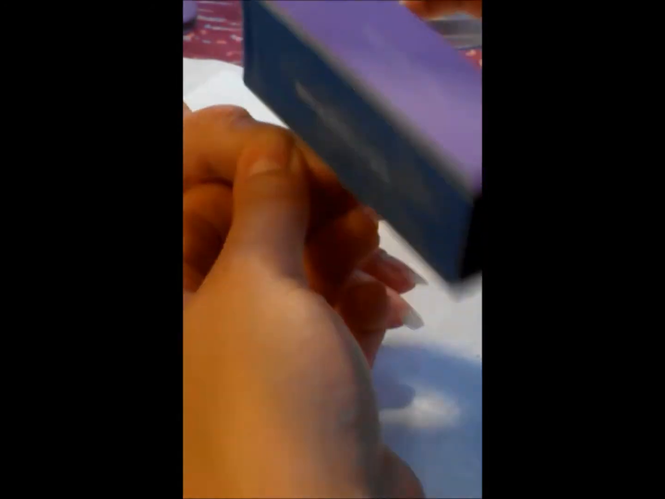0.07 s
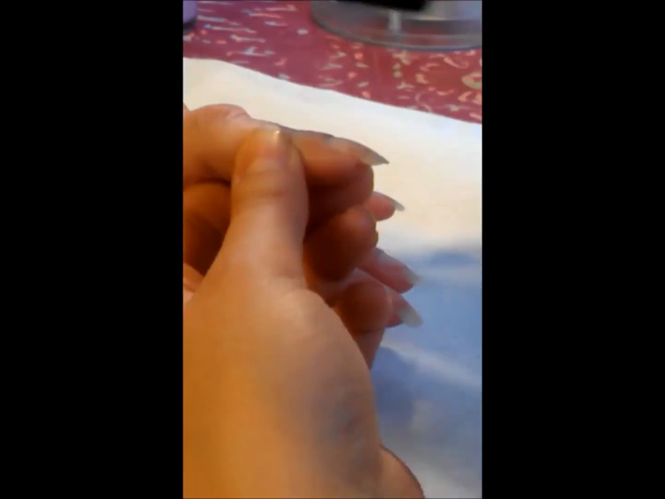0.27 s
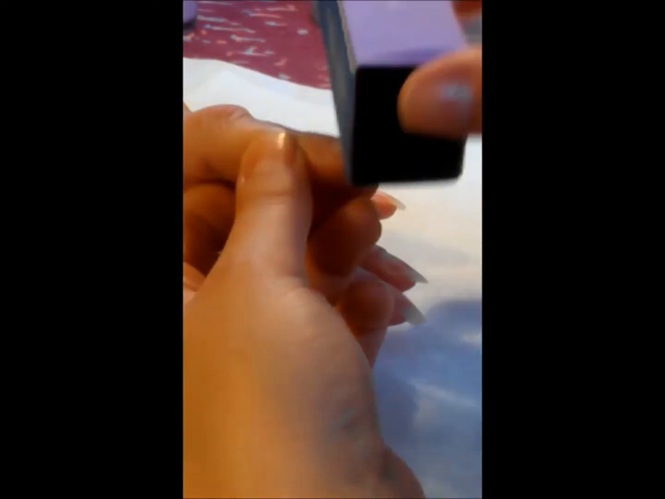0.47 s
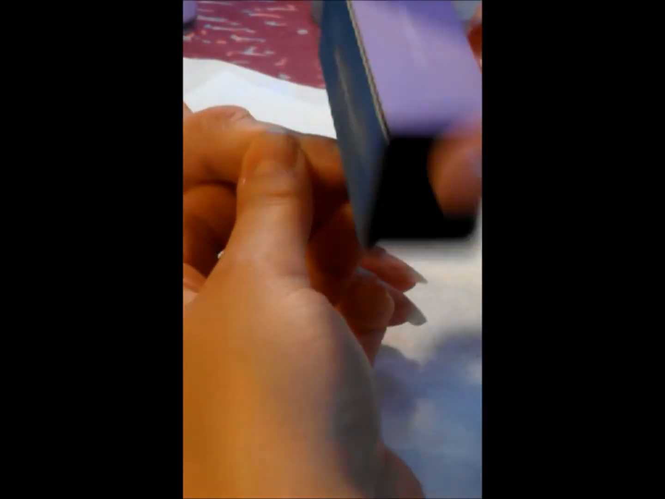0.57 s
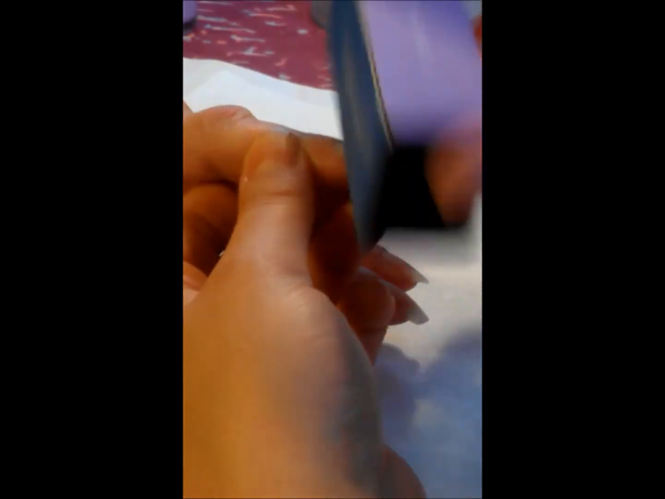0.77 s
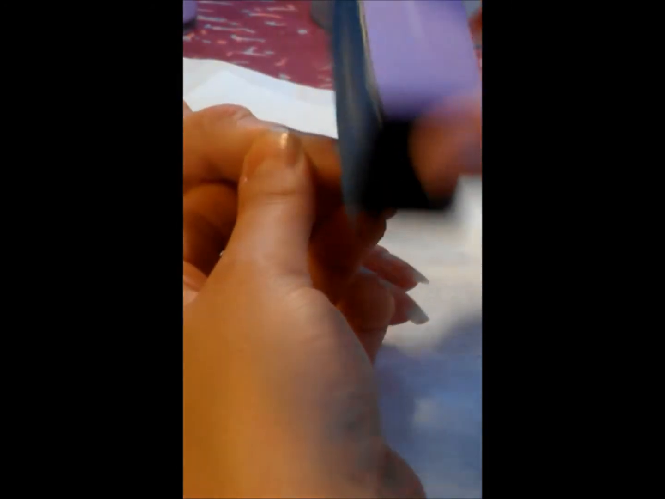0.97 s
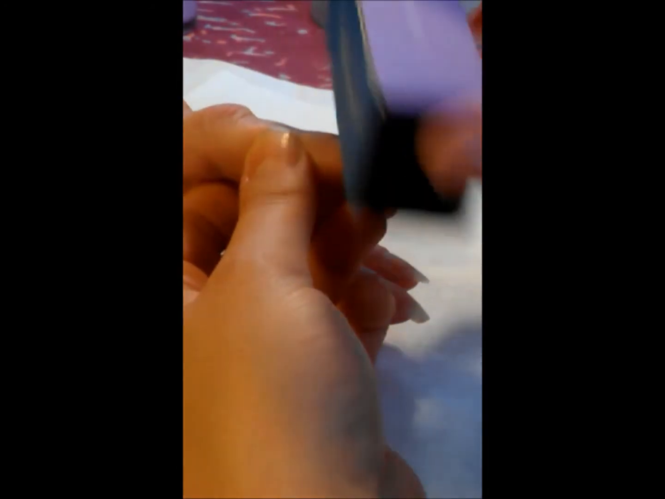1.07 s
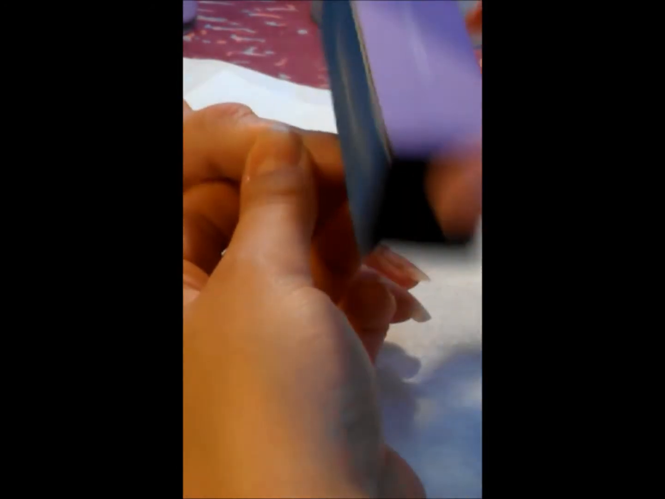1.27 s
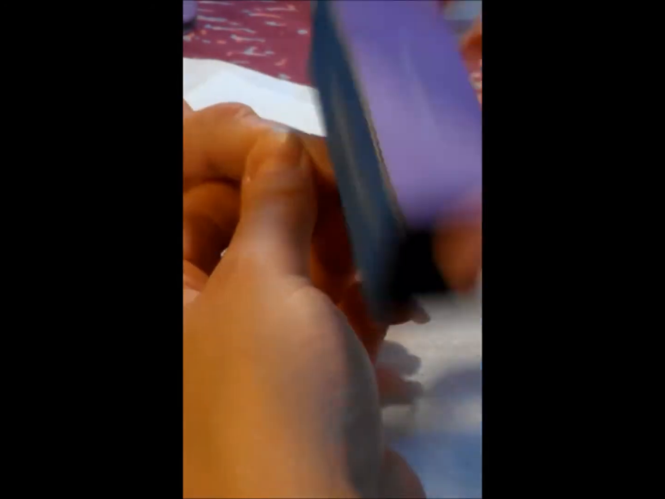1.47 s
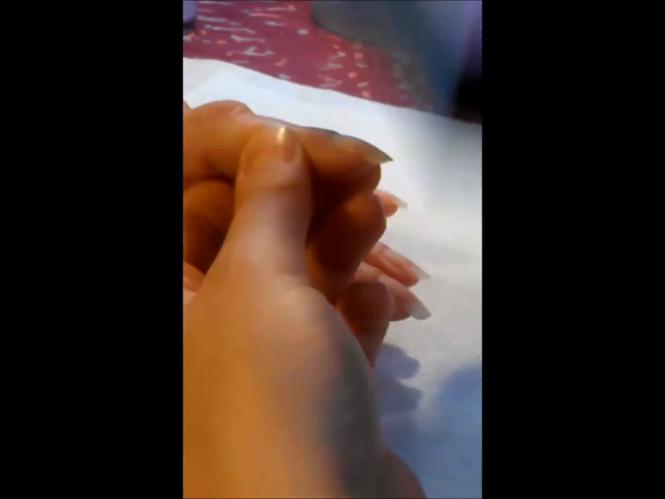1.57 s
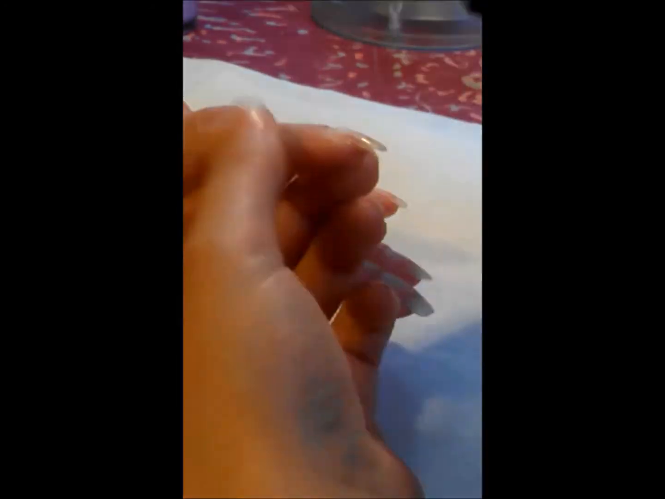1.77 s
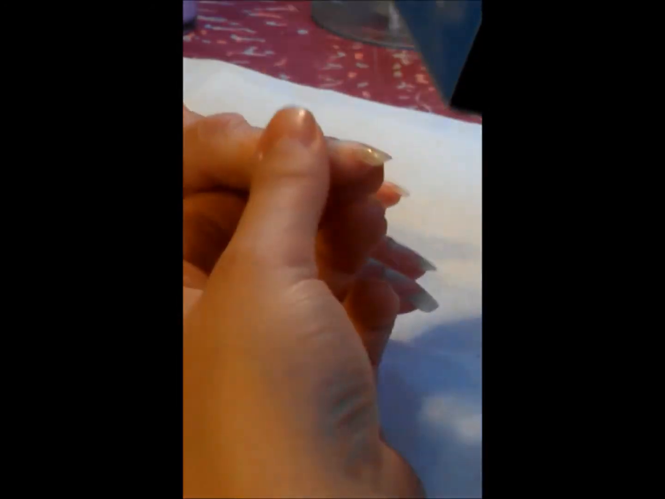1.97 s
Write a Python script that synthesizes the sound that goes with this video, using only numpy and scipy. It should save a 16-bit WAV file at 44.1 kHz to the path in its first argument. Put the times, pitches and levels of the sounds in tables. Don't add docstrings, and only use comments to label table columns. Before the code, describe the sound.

Dry, gritty nail filing heard close up in a small quiet room: a short burst of strokes, a brief gap, a soft click, faster alternating darker and brighter scrapes, then only low room noise and microphone hiss.

```python
import sys
import numpy as np
from scipy import signal
from scipy.fft import rfft, irfft, next_fast_len
from scipy.io import wavfile
from scipy.ndimage import uniform_filter1d, map_coordinates

SR = 44100
rng = np.random.default_rng(int(sys.argv[2]) if len(sys.argv) > 2 else 0)


def gain_from_decibels(decibels):
    exponent = np.asarray(decibels, float) / 20
    return 10 ** exponent


def dump_mix(stems):
    frames = np.atleast_2d(stems).T
    limited = np.clip(frames, -1, 1)
    pcm = np.round(limited * 32767).astype(np.int16)
    wavfile.write(sys.argv[1], SR, pcm)


N = 89126


def unit(x):
    return x / np.sqrt(np.mean(x ** 2) + 1e-20)


def filtered(x, response):
    m = next_fast_len(N + 8192)
    spectrum = rfft(x, m) * response(np.fft.rfftfreq(m, 1 / SR))
    return irfft(spectrum, m)[:N]


def rings(peaks):
    def response(f):
        total = 0
        for k, (hz, width_hz, db) in enumerate(peaks):
            damping = 1j * f * width_hz
            total = total + (-1) ** k * gain_from_decibels(db) * damping / (hz * hz - f * f + damping)
        return total
    return response


def band(lo_hz, hi_hz):
    return lambda f: 1 / (1 + (lo_hz / (f + 1)) ** 4) / (1 + (f / hi_hz) ** 4)


def colour(points):
    hz, db = np.transpose(points)
    return lambda f: gain_from_decibels(np.interp(np.log(f + 1), np.log(hz + 1), db, -120, -120))


def wobble(rate):
    knots = rng.standard_normal(int(N * rate / SR) + 4)
    return map_coordinates(knots, [np.arange(N) * rate / SR])


def controls():
    # (time [s], rubbing level [dB])
    strokes = [
        [(0.0, -34.5), (0.032, -33), (0.044, -45), (0.066, -52)],
        [(0.066, -56), (0.076, -42), (0.132, -33.5), (0.152, -37.5), (0.186, -62)],
        [(0.186, -59), (0.214, -41), (0.248, -36.5), (0.282, -38), (0.345, -63)],
        [(0.596, -65), (0.606, -44), (0.632, -38), (0.688, -33.5), (0.738, -53)],
        [(0.738, -86), (0.744, -42.5), (0.766, -34.5), (0.792, -34.5), (0.806, -29), (0.836, -57)],
        [(0.836, -71), (0.846, -38), (0.908, -29), (0.94, -45.5), (0.948, -68)],
        [(0.948, -45.5), (1.014, -30), (1.04, -41), (1.054, -72)],
        [(1.054, -65), (1.072, -40.5), (1.092, -34.5), (1.134, -35), (1.168, -58)],
        [(1.168, -48), (1.174, -44.5), (1.226, -36), (1.252, -43.5), (1.262, -53)],
        [(1.262, -56), (1.294, -34.5), (1.35, -41.5), (1.356, -34.5), (1.376, -61)],
        [(1.376, -51), (1.39, -41.5), (1.416, -42.5), (1.43, -35.5), (1.48, -32.5), (1.502, -59)],
        [(1.502, -53), (1.526, -33), (1.534, -37), (1.61, -30), (1.632, -35.5), (1.658, -55), (1.675, -69)],
    ]
    # (deep ring at start [dB], deep ring at end [dB], bright ring [dB], sheen [dB], drag [dB])
    stroke_colours = [(4.5, -2.5, 3, -0.5, 1), (7, -0.5, 3, 1, 1.5), (5, -2.5, 3, 3.5, 8.5),
                      (-2.5, 4.5, 1.5, 0.5, 10), (3.5, -11, 0, -1, -7), (-10, 14, 0.5, 1, 0),
                      (6, -12.5, 0, 0.5, -5), (-1.5, 3.5, 2, 1.5, 0), (6.5, -5, 1.5, 1, 0),
                      (-6.5, 11.5, 2, 1, -8), (7, -15, -0.5, 0.5, 0), (-2.5, 2, 2, 1, 1.5)]
    t, out = np.arange(N) / SR, np.zeros((5, N))
    out[0] = -90
    for rows, (first_db, last_db, *rest_db) in zip(strokes, stroke_colours):
        s, db = np.transpose(rows)
        on = t >= s[0]
        fade_db = np.maximum(t[on] - s[-1], 0) * 1500
        out[0, on] = np.interp(t[on], s, db) - fade_db
        out[1, on] = np.interp(t[on], s[[0, -1]], [first_db, last_db])
        out[2:, on] = np.array(rest_db)[:, None]
    return out


def grit():
    grains_per_s, grain_spread_db = 9000, 2.5
    chatter_db, chatter_per_s = 0.5, 280
    chance, luck, side = rng.random((3, N))
    caught = chance < grains_per_s / SR
    size = gain_from_decibels(-grain_spread_db * np.log(luck + 1e-4)) * np.sign(side - .5)
    return unit(caught * size * gain_from_decibels(chatter_db * wobble(chatter_per_s)))


def patchy(x):
    patchy_db = 2
    z = signal.stft(x, nperseg=512)[2]
    field = uniform_filter1d(rng.standard_normal(z.shape), size=3, axis=0)
    field = uniform_filter1d(field, size=6, axis=1)
    return unit(signal.istft(z * gain_from_decibels(patchy_db * unit(field)), nperseg=512)[1][:N])


def grit_ring(peaks, skirt):
    response = rings(peaks)
    return patchy(filtered(grit(), lambda f: response(f) * skirt(f)))


def buffer():
    # (frequency [Hz], width [Hz], level [dB])
    nail_peaks = [(3032, 343, 9), (3490, 360, 6)]
    # (frequency [Hz], width [Hz], level [dB])
    deep_peaks = [(1806, 710, -3.5), (2584, 400, 15.5)]
    # (frequency [Hz], width [Hz], level [dB])
    bright_peaks = [(3483, 400, 5.5), (4047, 220, -10.5)]
    # (frequency [Hz], width [Hz], level [dB])
    edge_peaks = [(4200, 1140, -1), (5020, 190, 2)]
    # (frequency [Hz], level [dB per Hz])
    sheen_colour = [(4500, -7), (5600, -0.5), (7800, -9.5), (10000, -5.5), (14000, -2.5), (16000, -3)]
    # (frequency [Hz], level [dB per Hz])
    drag_colour = [(400, -3), (650, -19), (770, 1.5), (900, -9), (1600, -10.5), (2200, 3.5)]
    sheen_base_db, sheen_grows = -24, 0.29
    edge_base_db, edge_grows = -20, 0.53
    level_db, deep_db, bright_db, sheen_db, drag_db = controls()

    deep, bright = gain_from_decibels(deep_db - 3.5), gain_from_decibels(bright_db - 7)
    body = grit_ring(nail_peaks, band(2300, 3000))
    body = body + deep * grit_ring(deep_peaks, band(1100, 3310))
    body = body + bright * grit_ring(bright_peaks, band(3600, 4300))
    body = gain_from_decibels(level_db) * body / np.sqrt(1 + deep ** 2 + bright ** 2)

    slide_db = uniform_filter1d(level_db, size=SR // 50)
    sheen_gain = gain_from_decibels(sheen_grows * (slide_db + 38.5) - 34 + sheen_base_db + sheen_db)
    sheen = sheen_gain * unit(filtered(rng.standard_normal(N), colour(sheen_colour)))
    drag = gain_from_decibels(level_db - 24 + drag_db) * unit(filtered(grit(), colour(drag_colour)))

    edge_skirt = lambda f: band(3600, 7000)(f) / (1 + (f / 5300) ** 16)
    edge_gain = gain_from_decibels(edge_grows * (level_db + 34.5) - 35.5 + edge_base_db + bright_db)
    edge = edge_gain * grit_ring(edge_peaks, edge_skirt)
    return body + edge + sheen + drag


def taps():
    # (time [s], ring [dB], click [dB], thump [dB])
    contacts = [
        (.5735, -41, -37, -44),
        (.585, -46, -62, -58),
        (.605, -47, -46, -56),
        (.843, -34, -52, -60),
        (1.0705, -39, -52, -60),
        (1.172, -45, -52, -60),
        (1.2765, -36, -52, -60),
        (1.5225, -30, -50, -60),
        (1.9, -70, -55, -70),
    ]
    # (frequency [Hz], level [dB], decay t60 [s])
    tap_ring = [(3150, 0, .03), (3440, -6, .02)]
    scatter = .01
    out, t = np.zeros(N + SR), np.arange(SR // 10) / SR

    def dying(hz, db, t60, rise_s):
        return gain_from_decibels(db - 60 * t / t60) * (1 - np.exp(-t / rise_s)) * np.sin(2 * np.pi * hz * t)

    for s, ring_db, click_db, thump_db in contacts:
        tap = dying(2600, click_db + 10, .0012, .00005)
        tap = tap + dying(432, thump_db, 0.052, 0.0027)
        for hz, db, t60 in tap_ring:
            tap = tap + dying(hz * (1 + scatter * rng.standard_normal()), ring_db + db, t60, .0005)
        out[round(s * SR):][:len(t)] += tap
    return out[:N]


def room(x):
    t60_s, level_db = .35, -11
    port_hz, port_width_hz = 3380, 700
    t = np.arange(SR // 2) / SR
    tail = rng.standard_normal(len(t)) * gain_from_decibels(-60 * t / t60_s)
    wet = signal.fftconvolve(x, tail / np.linalg.norm(tail))[:N]
    return gain_from_decibels(level_db) * filtered(wet, rings([(port_hz, port_width_hz, 0)]))


def air():
    # (frequency [Hz], level [dB per Hz])
    air_colour = [(35, -40), (90, -32), (300, -1.5), (750, -7.5), (3500, -13.5), (7800, -21.5),
                  (14000, -16), (15800, -20.5)]
    level_db, sway_db, sway_per_s = -52.25, .35, 3.64
    gain = gain_from_decibels(level_db + sway_db * wobble(sway_per_s))
    return gain * unit(filtered(rng.standard_normal(N), colour(air_colour)))


def scene():
    low_cut_hz = 170
    near = filtered(buffer() + taps(), lambda f: 1 / (1 + (low_cut_hz / (f + 1)) ** 8))
    return (near + room(near) + air())[None]


def top_cut(x):
    return signal.sosfilt(signal.butter(12, 15990, fs=SR, output="sos"), x)


def record(dry):
    top_hz = 15740
    mix = filtered(dry[0], lambda f: f < top_hz)[None]
    return top_cut(mix)


dry = scene()
out = record(dry)
dump_mix(out)
```